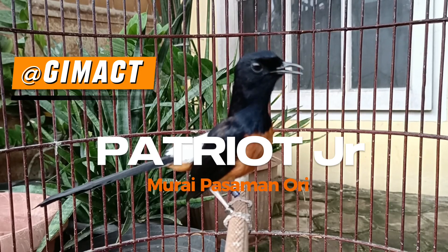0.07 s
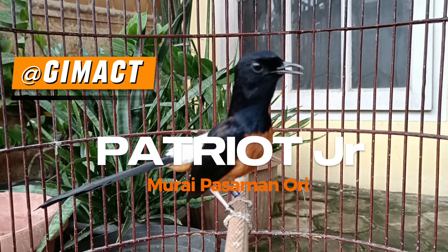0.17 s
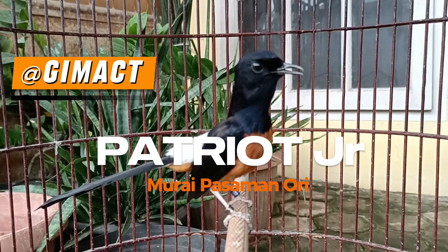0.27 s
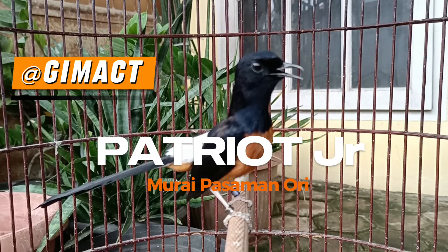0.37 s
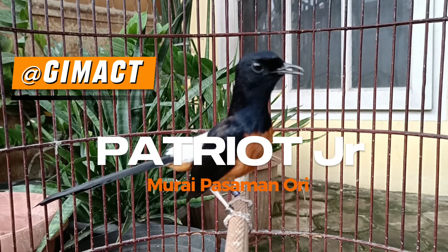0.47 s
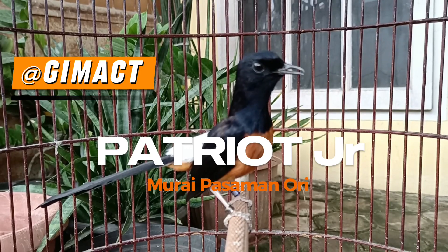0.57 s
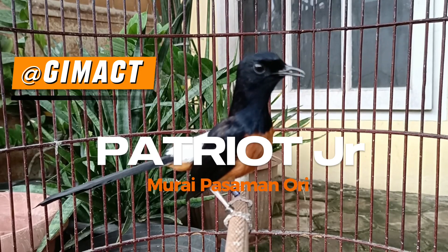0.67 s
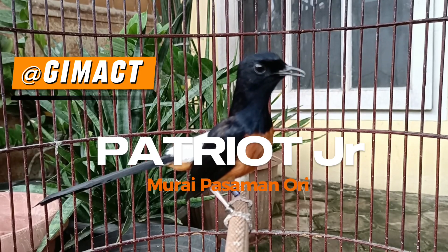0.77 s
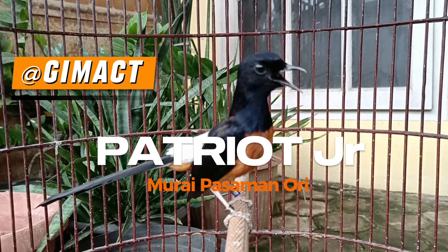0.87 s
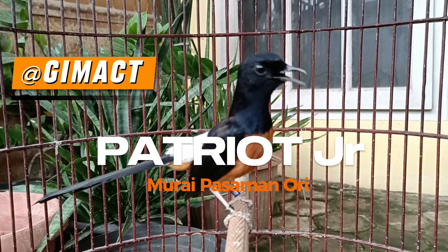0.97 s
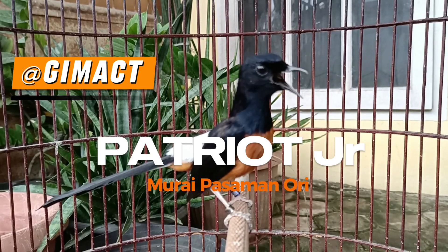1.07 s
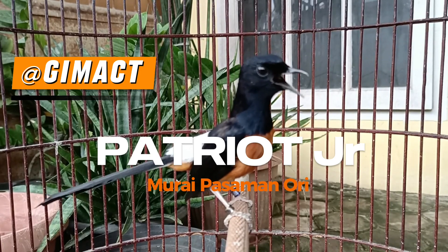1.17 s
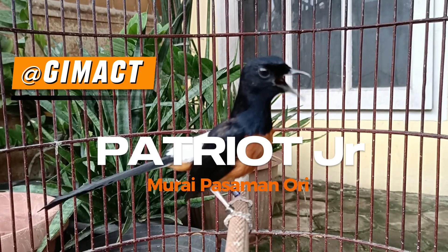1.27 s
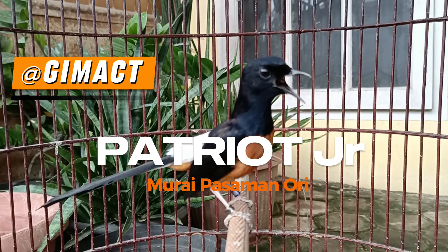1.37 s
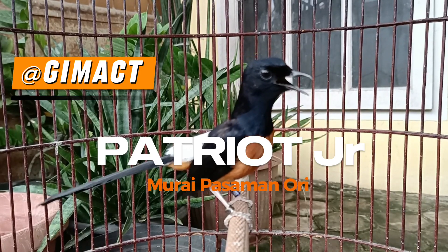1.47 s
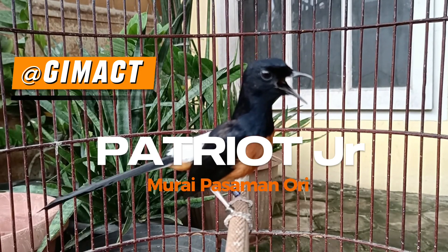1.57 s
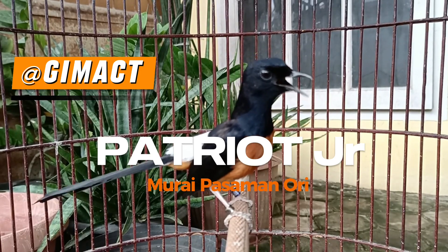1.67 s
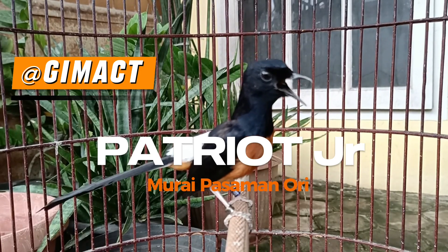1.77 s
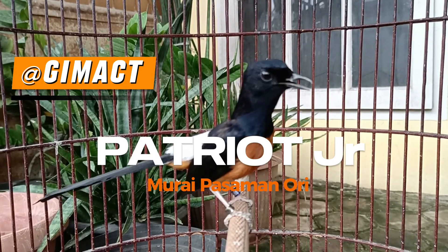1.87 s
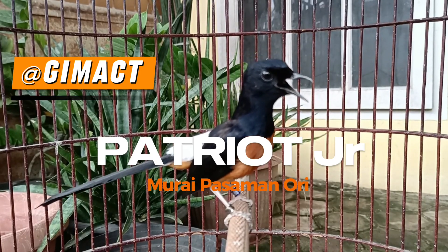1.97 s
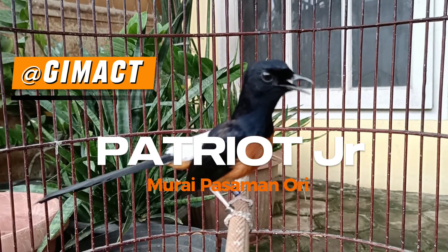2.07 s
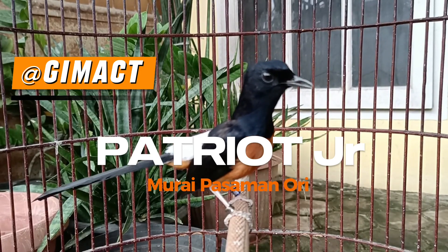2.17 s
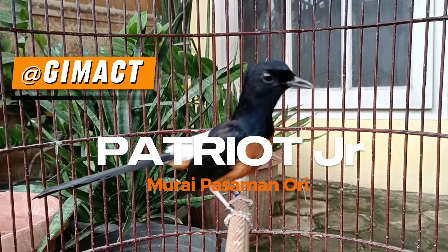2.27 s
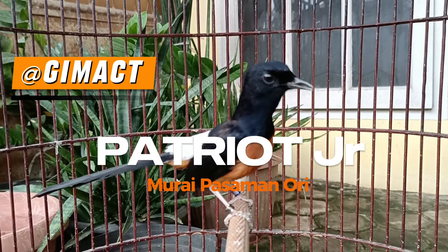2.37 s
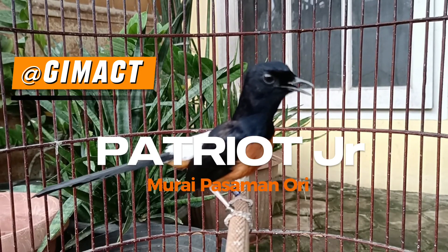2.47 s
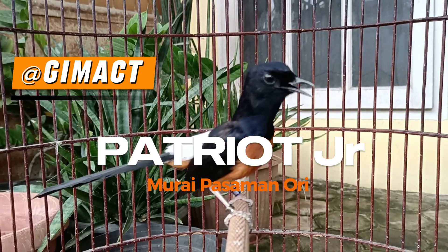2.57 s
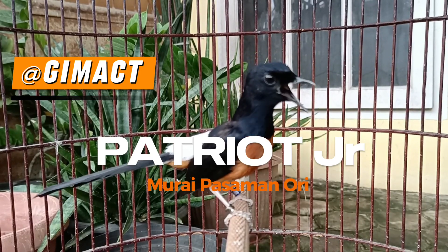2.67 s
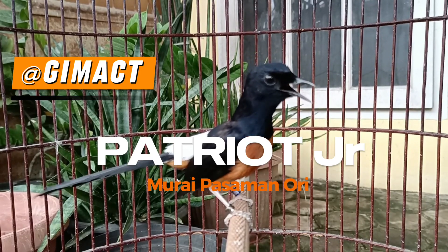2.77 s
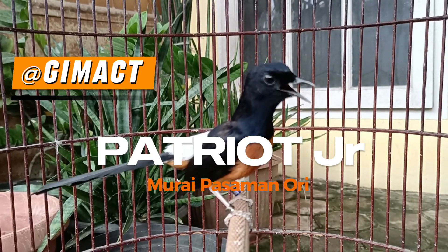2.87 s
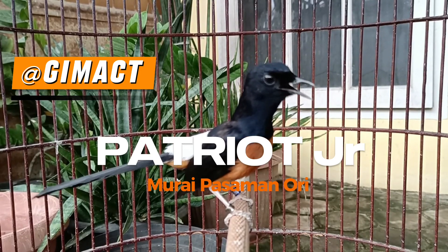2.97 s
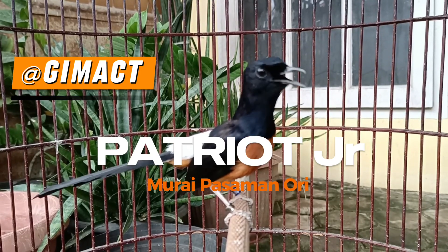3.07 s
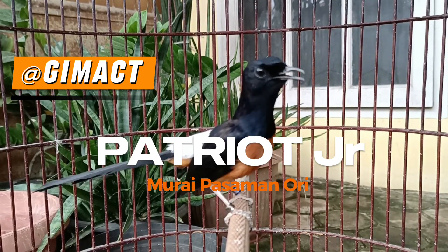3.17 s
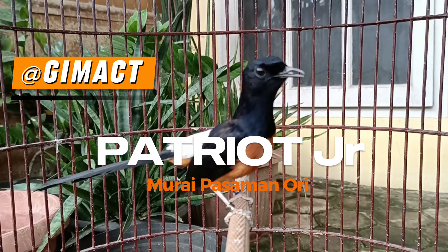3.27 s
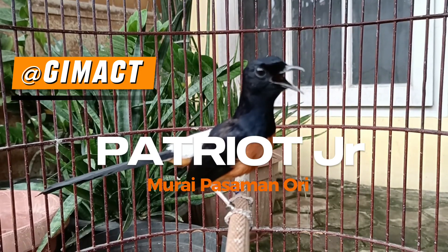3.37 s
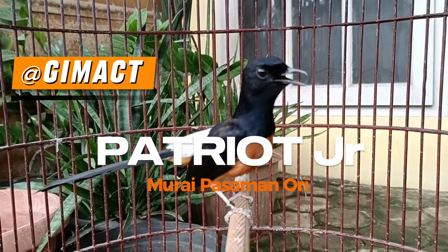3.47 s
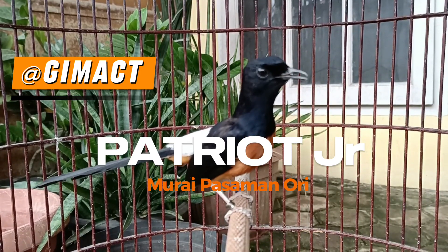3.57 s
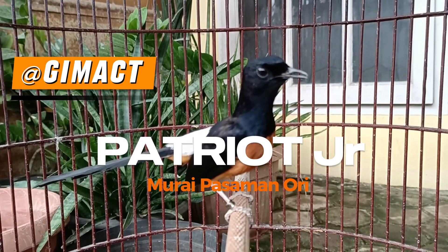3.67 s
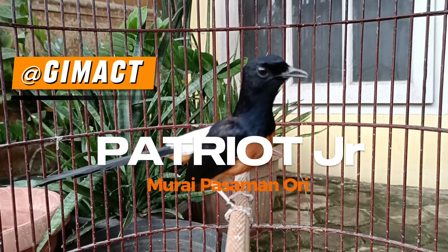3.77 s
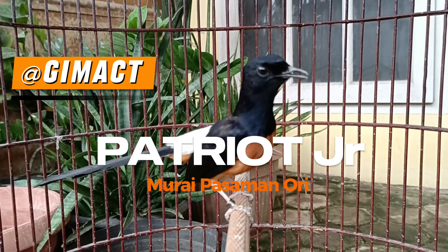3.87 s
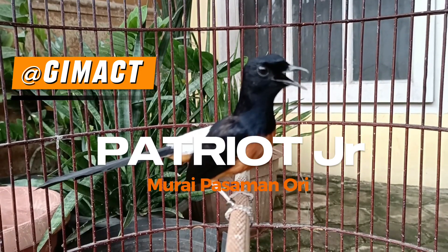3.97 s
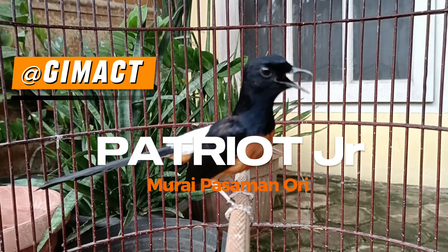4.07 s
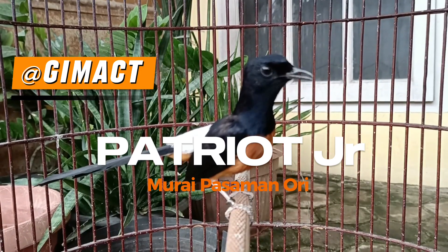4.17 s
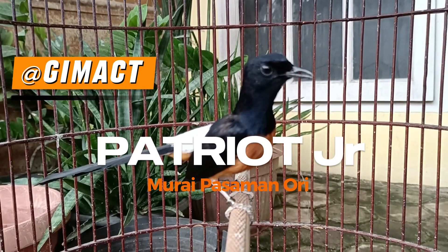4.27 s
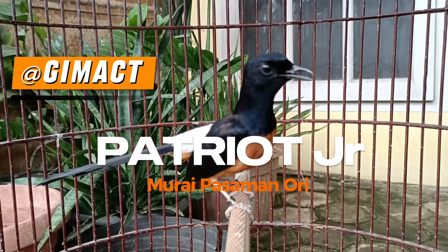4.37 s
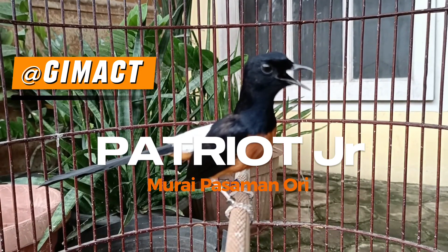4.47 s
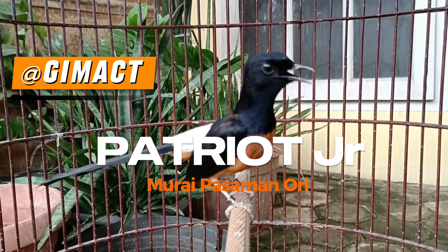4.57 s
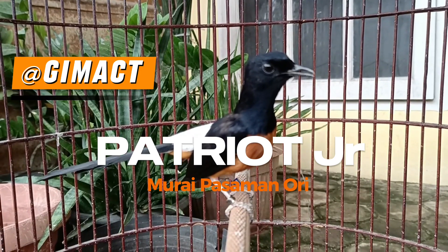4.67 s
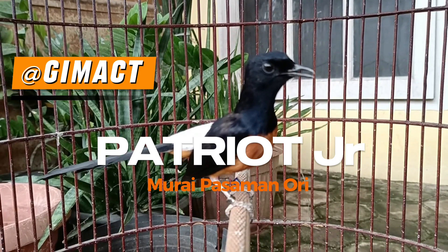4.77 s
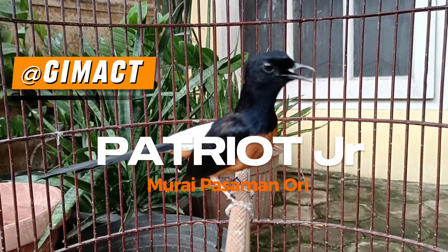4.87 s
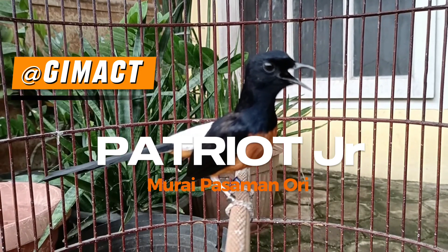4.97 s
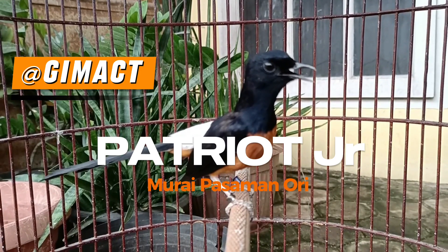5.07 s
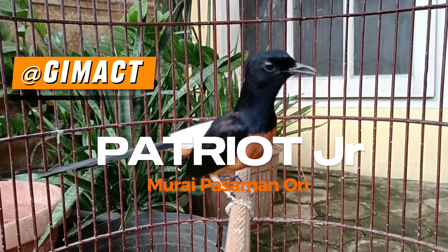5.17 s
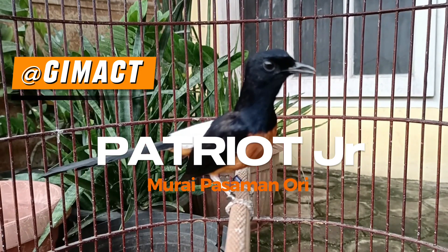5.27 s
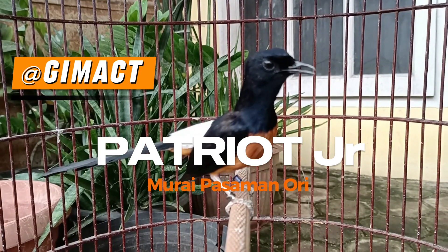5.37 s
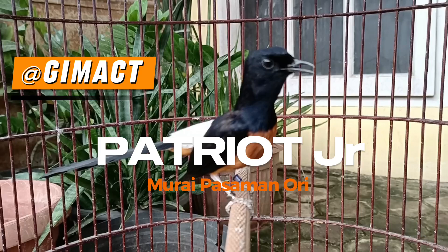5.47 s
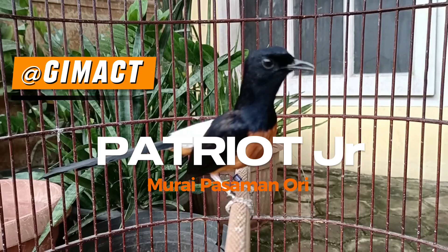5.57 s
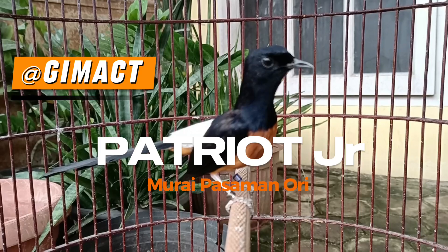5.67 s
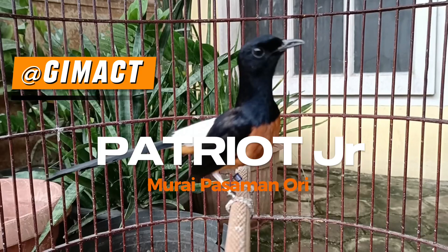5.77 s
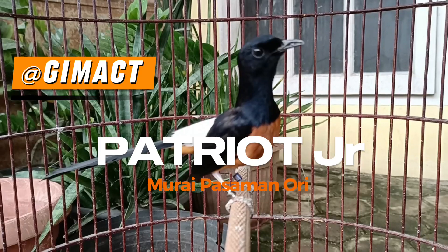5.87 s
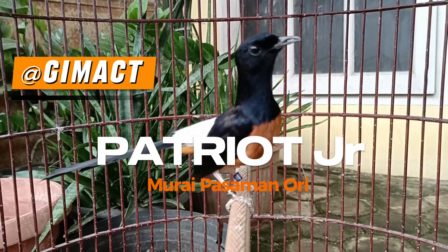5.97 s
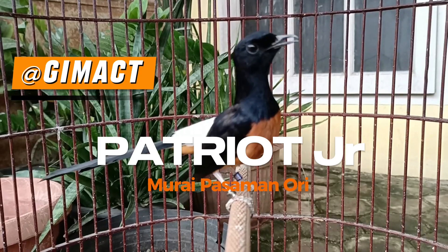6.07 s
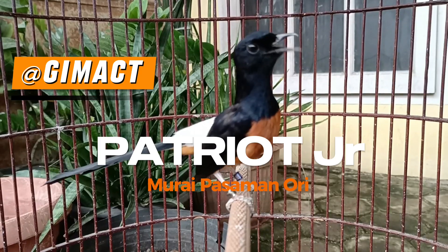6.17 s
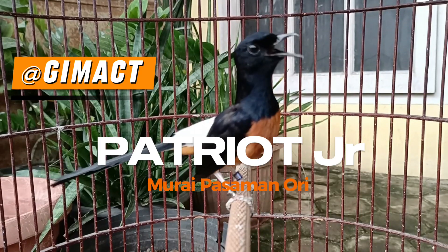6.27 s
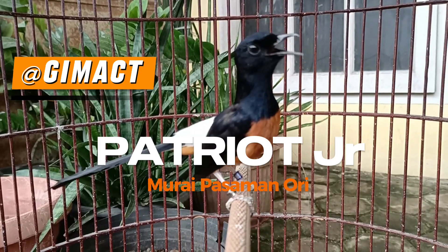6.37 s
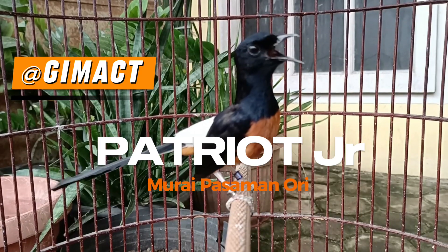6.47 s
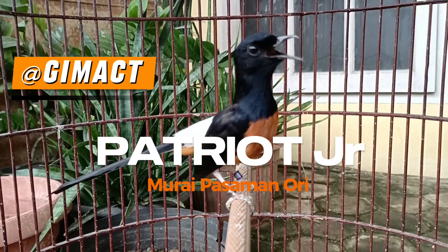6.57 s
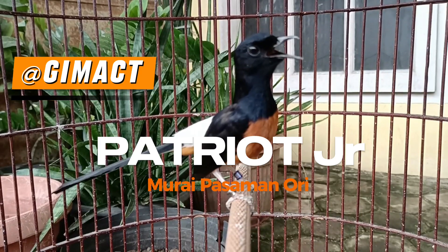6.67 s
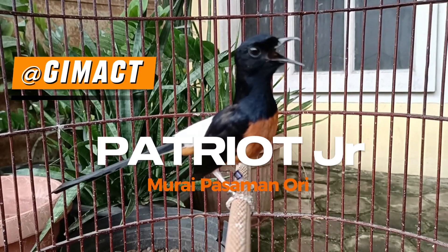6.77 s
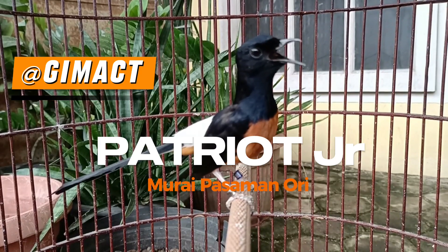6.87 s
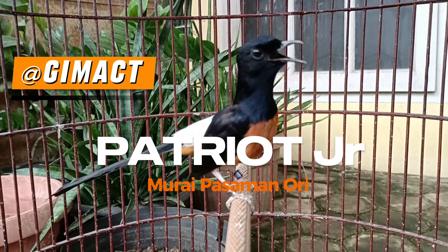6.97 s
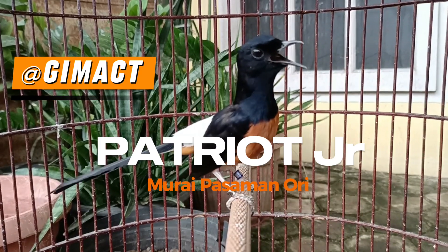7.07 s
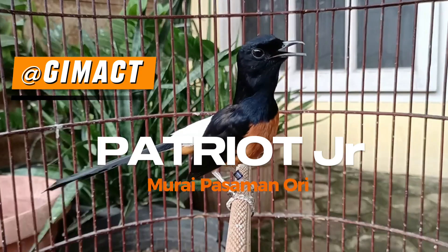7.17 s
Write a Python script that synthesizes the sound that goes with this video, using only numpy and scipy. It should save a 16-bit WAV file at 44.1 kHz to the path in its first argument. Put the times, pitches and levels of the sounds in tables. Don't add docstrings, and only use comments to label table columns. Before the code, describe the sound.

Close, bright birdsong with trilled upsweeps, spaced loud whistles and a rapid string of short notes, over soft open air and far engines.

```python
import sys
import numpy as np
from scipy import signal
from scipy.io import wavfile
from scipy.ndimage import uniform_filter1d, minimum_filter1d

SR = 44100
rng = np.random.default_rng(int(sys.argv[2]) if len(sys.argv) > 2 else 0)


def invert_db(level):
    return 10 ** (np.asarray(level, dtype=float) / 20)


def digitize_waveform(pressure):
    field = np.atleast_2d(pressure).T
    bounded = np.clip(field, -1, 1)
    quanta = np.round(bounded * 32767).astype(np.int16)
    wavfile.write(sys.argv[1], SR, quanta)


N = 318833
T = np.arange(N) / SR


def band(x, lo_hz, hi_hz, order=2):
    sos = signal.butter(order, [lo_hz, min(hi_hz, .45 * SR)], "band", fs=SR, output="sos")
    return signal.sosfilt(sos, x)


def split(x, kind, edge_hz):
    return signal.sosfilt(signal.butter(2, edge_hz, kind, fs=SR, output="sos"), x)


def unit(x):
    return x / np.sqrt(np.mean(x ** 2))


def walk(rate_hz):
    hold = int(SR / rate_hz)
    steps = np.repeat(rng.standard_normal(N // hold + 1), hold)
    return unit(uniform_filter1d(uniform_filter1d(steps, hold), hold)[:N])


def on_log(hz, table):
    table_hz, table_db = np.transpose(table)
    return np.interp(np.log(hz), np.log(table_hz), table_db)


# pitch_hz, level_db (per Hz)
AIR_SPECTRUM = [(12, -40), (20, -10), (76, -7), (153, -8), (181, -12.5), (355, -15.5), (539, -20),
                (891, -22), (3700, -24), (8800, -27), (15800, -37)]
# time_s, level_db
RUMBLE_SWELL = [(0.0, -59), (0.22, -63.5), (1.99, -58), (2.86, -62), (3.7, -62), (3.96, -63), (5.03, -61),
                (5.36, -61), (6.52, -61), (6.8, -64), (7.23, -60.5)]


def air():
    out = 0
    s, db = np.transpose(RUMBLE_SWELL)
    swell_db = np.interp(T, s, db - np.mean(db))
    for hz in 22 * 2 ** np.arange(0, 9.6, .5):
        mid, side = (unit(band(rng.standard_normal(N), hz / 2 ** .25, hz * 2 ** 0.17)) for _ in range(2))
        side_share = np.clip(hz / 550., .4, 1)
        level_db = on_log(hz, AIR_SPECTRUM) + 10 * np.log10(hz / (1 + side_share ** 2)) + 1.5 * walk(7.2)
        level_db = level_db + swell_db * np.clip(500 / hz, 0, 1)
        out = out + invert_db(level_db) * (mid + side_share * side * np.array([[1], [-1]]))
    return unit(out) * invert_db(-52.8)


def hushed_air(heard):
    hush_db, ebb_db_per_s = 5.0, .75
    loud = np.clip(uniform_filter1d(np.abs(heard).mean(axis=0), size=3000) / .03, 0, 1)
    hiss = air()
    treble, bass = split(hiss, "high", 3000), split(hiss, "low", 3000)
    return bass - treble * invert_db(-hush_db * loud - ebb_db_per_s * T)


def engine(curve, orders):
    s, hz, db = np.transpose(curve)
    phase = 2 * np.pi * np.cumsum(np.interp(T, s, hz) * (1 + .003 * walk(12))) / SR
    tone = sum(invert_db(order_db + 2.0 * walk(5)) * np.sin(k * phase) for k, order_db in orders)
    return tone * invert_db(np.interp(T, s, db, left=-140, right=-140)) * np.sqrt(2)


# multiple, level_db
SCOOTER_RUN = [(1.5, 183.2, -86), (2.0, 187.4, -70.5), (2.4, 192, -69), (2.8, 200.4, -70.5),
               (2.9, 205, -92.5)]
SCOOTER_PARTIALS = [(2, -8), (3, -3), (4, 2.5), (5, -9)]
TRUCK_RUN = [(2.6, 34, -73.5), (3.6, 34.3, -63.5), (4.6, 35, -64.5), (5.5, 36.69, -63), (6.5, 38.64, -62),
             (7.23, 40.02, -61.5)]
TRUCK_PARTIALS = [(1, -5), (2, 0), (3, 0.5), (4, -4.5)]


def far_engines():
    return engine(SCOOTER_RUN, SCOOTER_PARTIALS) + engine(TRUCK_RUN, TRUCK_PARTIALS)


# time_s, pitch_hz, level_db
NEIGHBOUR = [
    [(.92, 2120, -42), (1.06, 2180, -53.5)],
    [(1.14, 2180, -46), (1.25, 2220, -54.5)],
    [(4.71, 2400, -41), (4.73, 1950, -41.5), (4.77, 2250, -51.5)],
    [(5.77, 1800, -47.5), (5.81, 2400, -47), (5.825, 1650, -43), (5.85, 2300, -47), (5.87, 1750, -51.5)],
]
# time_s, pitch_hz, level_db
DOVE_COOS = [
    [(2.81, 660, -47), (2.835, 710, -39), (2.86, 800, -45)],
    [(2.885, 700, -46), (2.925, 760, -38), (2.975, 720, -40), (3.0, 690, -46)],
    [(2.995, 400, -44), (3.012, 480, -34), (3.05, 540, -43), (3.12, 520, -49)],
]


def far_birds():
    notes = NEIGHBOUR + DOVE_COOS
    return sing(notes, [(-43, -51, 0.021, 0.49)] * len(notes))


# delay_ms, left_db, right_db
WALL_ECHOES = [(4.352, -23.5, -24.5), (9.06, -23, -14), (14.6, -24, -22), (22.9, -23.5, -23)]
# low_hz, high_hz, t60_s, level_db
WALL_TAILS = [
    (60, 6800, 0.37, -15),
    (6800, 23000, 0.3, -9),
    (300, 19000, 0.89, -34),
]


def yard(x):
    alike = .35
    t = np.arange(SR) / SR
    response = 0
    for lo_hz, hi_hz, t60, db in WALL_TAILS:
        noise = rng.standard_normal((3, len(t)))
        noise = np.sqrt(alike) * noise[0] + np.sqrt(1 - alike) * noise[1:]
        fade = np.exp(-np.log(1000) * t / t60) * np.clip(t / 0.018, 0, 1)
        fade = fade / np.sqrt(np.sum(fade ** 2))
        response = response + invert_db(db) * band(noise, lo_hz, hi_hz, order=3) * fade
    for delay_ms, *db in WALL_ECHOES:
        response[:, int(delay_ms * SR / 1000)] += invert_db(np.array(db))
    return signal.fftconvolve(x, response, axes=1)[:, :N]


# start_s, length_s, low_db, middle_db, high_db
RUSTLE_BURSTS = [(1.557, 0.068, -55, -51, -46), (1.695, .01, -48, -61, -54.5),
                 (2.16, .035, -51.5, -45.5, -39.5), (3.017, .04, -54, -59.5, -74.5),
                 (3.039, 0.026, -62, -47, -37.5), (3.223, 0.024, -60.5, -57, -50),
                 (3.266, 0.02, -34, -31, -40), (4.896, .02, -64.5, -51, -44),
                 (5.253, 0.06, -53.5, -64, -70.5), (7.08, 0.07, -72, -68, -39),
                 (2.87, 0.12, -61, -75.5, -77.5), (6.145, .015, -75, -62, -54), (6.3, .04, -75, -58, -61)]
# low_hz, high_hz
RUSTLE_RANGES = [(70, 800), (800, 3600), (3600, 8500)]


def rustles():
    out = np.zeros((2, N))
    grain = invert_db(1.6 * walk(500))
    for c, (lo_hz, hi_hz) in enumerate(RUSTLE_RANGES):
        shape = np.zeros(N)
        for s, length, *db in RUSTLE_BURSTS:
            rise = .3 * length
            fade = np.exp(-np.clip(T - s - rise - length, 0, 1) / 0.034)
            shape += invert_db(db[c]) * np.clip((T - s) / rise, 0, 1) * fade
        noise = rng.standard_normal((3, N))
        x = band((noise[0] + 0.28 * c * noise[1:]) * grain, lo_hz, hi_hz, order=2 - c // 2)
        out += unit(x) * shape * invert_db(2.5 * walk(40)) * invert_db(np.array([[-1.5], [1.5]]))
    return out


# low_hz, high_hz, level_db
QUILL_RANGES = [(2500, 3600, -35), (4900, 6200, -31.5), (11000, 15500, -48)]


def quills():
    start_s, length_s = 7.105, .075
    swell = np.clip((T - start_s) / 0.022, 0, 1)
    swell = swell * np.exp(-np.clip(T - start_s - length_s, 0, 1) / 0.027)
    hiss = sum(invert_db(db) * unit(band(rng.standard_normal((2, N)), lo_hz, hi_hz))
               for lo_hz, hi_hz, db in QUILL_RANGES)
    return swell * hiss


# start_s, end_s, rate_hz, speed_up_hz_per_s, depth_hz
SHAKES = [(1.708, 1.83, 61, 20, 200), (1.937, 2.06, 49, 130, 345), (0.51, .93, 110, 0, 40),
          (.99, 1.47, 75, 0, 38), (1.52, 1.63, 70, 0, 80), (2.63, 2.78, 39, 0, 45)]


def trill(t, wobble):
    shake = np.zeros(len(t))
    for start, end, rate_hz, gain_per_s, depth_hz in SHAKES:
        cycles = (rate_hz + gain_per_s * (t - start) / 2) * (t - start)
        p = 2 * np.pi * cycles + .25 * wobble
        onset = np.clip((t - start + 0.0026) / 0.0035, 0, 1)
        shake += depth_hz * onset * (t < end) * (0.38 * np.sin(2 * p) - np.cos(p))
    return shake


# pitch_hz, level_db
BEAK_LIFT = [(2500, -0.5), (5200, -7), (7800, -6), (9500, -7.5), (11300, 5.5), (12300, -8), (13500, 2),
             (15300, 11)]


def sing(notes, voices):
    out = np.zeros((2, N))
    waver, flutter_db, wobble = 1 + 0.005 * walk(220), .5 * walk(90), walk(60)
    breath = 1 + 0.006 * walk(1800)
    splash = unit(band(rng.standard_normal((2, N)), 3700, 5800, order=3)) * invert_db(-38)
    for note, (second_db, third_db, pan_db, lag_ms) in zip(notes, voices):
        s, hz, db = np.transpose(note)
        a, b = max(int((s[0] - .003) * SR), 0), min(int((s[-1] + .006) * SR), N)
        t, lag_s = T[a:b], lag_ms / 1000
        pitch = uniform_filter1d(np.interp(t, s, hz), size=200) * waver[a:b] + trill(t, wobble[a:b])
        phase = 2 * np.pi * np.cumsum(pitch) / SR
        fade = np.clip(np.minimum(t - t[0], s[-1] + .004 - t) / .004, 0, 1)
        pressure = uniform_filter1d(np.interp(t, s, invert_db(db / 2)), size=150)
        gain = pressure ** 2 * invert_db(flutter_db[a:b]) * np.sin(fade * np.pi / 2) ** 2 * np.sqrt(2)
        effort = (pressure / pressure.max()) ** .6
        for port, side in enumerate((1, -1)):
            p, g = (np.interp(t - side * lag_s / 2, t, v) for v in (phase, gain))
            tone = np.sin(p) * invert_db(side * pan_db / 2)
            for k, part_db in ((2, second_db), (3, third_db), (4, third_db - 27)):
                shade_db = 1.3 * (k - 1) * side
                level_db = part_db + on_log(k * pitch, BEAK_LIFT) - shade_db + 6.4 * flutter_db[a:b]
                tone += invert_db(level_db) * effort * (k * pitch < .45 * SR) * np.sin(k * p)
            opening = np.clip(np.gradient(g) * SR * .005, 0, 1)
            out[port, a:b] += g * tone * breath[a:b] + opening * splash[port, a:b]
    return out


def syllables(shape, rows):
    share, place, db = np.transpose(shape)
    return [np.transpose([s + length * share, from_hz + (to_hz - from_hz) * place, top_db + db])
            for s, length, from_hz, to_hz, top_db in rows]


# second_partial_db, third_partial_db, left_minus_right_db, left_lag_ms
SWEEP_GESTURE = [(0, 0, -18), (.06, 0, -3), (.27, .13, 0), (.5, .47, 1), (.64, .7, -1), (.82, .96, 0),
                 (1, 1, -7)]
SWEEP_ROWS = [(.959, .128, 3900, 5560, -10), (1.128, .137, 3964, 5620, -9.5),
              (1.306, .134, 3940, 5570, -10), (1.479, .141, 4080, 5590, -11)]
SWEEP_TIMBRE = (-20, -26, -2.2, .476)
WARBLE_GESTURE = [(0, .15, -26), (.07, .02, -3), (.2, .12, 0), (.35, .25, 0), (.6, .62, -1), (.82, 1, -2.5),
                  (1, .9, -11)]
WARBLE_ROWS = [(1.669, .141, 4400, 5350, -9), (1.904, .141, 4250, 4950, -9)]
WARBLE_TIMBRE = (-21, -27, -3, .48)
STEP_GESTURE = [(0, .3, -40), (.13, 0, -13), (.22, .6, -7), (.5, 1, 0), (.86, .75, -6), (1, 0, -26)]
STEP_ROWS = [(2.624, .141, 4400, 4540, -8.5)]
STEP_TIMBRES = [(-14, -17.5, -2.5, .4845)]
FLICK_GESTURE = [(0, 0, -12), (.48, .55, 0), (1, 1, -13)]
FLICK_ROWS = [(3.881, .015, 3000, 4400, -37.5), (4.36, .022, 3450, 4400, -41),
              (4.853, .016, 2900, 4380, -28), (5.338, .02, 2600, 3550, -32)]
SOFT_TIMBRE = (-41, -51.5, -2.0, 0)
SCOOP_GESTURE = [(0, 0, -28), (.26, .62, -23), (.48, .86, 0), (1, 1, -3)]
SCOOP_ROWS = [(3.88, .05, 1945, 3146, -26), (4.36, .06, 1890, 3120, -27), (4.845, .065, 1736, 3158, -22.5)]
SCOOP_TIMBRE = (-19, -54, -15, -.055)
WHISTLE_GESTURE = [(0, -.15, -25), (.1, .02, -9), (.2, 0, 0), (.33, 0, 0), (.55, .25, -1), (.78, .52, -4),
                   (.9, .75, -4), (.95, 1.15, -8), (1, 1.1, -26)]
WHISTLE_ROWS = [(3.924, .14, 4075, 4390, -7), (4.409, .142, 4095, 4400, -6.5),
                (4.902, .143, 4067, 4380, -6.5)]
WHISTLE_TIMBRE = (-28, -28, 0, -.04)
SLIDE_GESTURE = [(0, 0, -24), (.2, .65, -12), (.33, .95, 0), (.8, 1, -3), (1, 1, -6)]
SLIDE_ROWS = [(6.15, .047, 4900, 4420, -16), (7.054, .062, 4600, 4030, -6)]
SLIDE_TIMBRES = [(-8.5, -33.5, -5.5, .03), (-18, -35, .5, -.044)]
PIP_GESTURE = [(0, -2.2, -24), (.07, -.6, -11), (.2, -.1, -2), (.4, .2, 0), (.76, .6, 0), (.9, .9, -4),
               (1, 1, -18)]
PIP_ASIDE_ROWS = [(6.228, .034, 4410, 4480, -11), (6.301, .038, 4420, 4480, -10),
                  (6.37, .035, 4490, 4560, -13), (6.446, .03, 4440, 4500, -9)]
PIP_ASIDE_TIMBRE = (-15, -30, -7, .032)
PIP_ROWS = [(6.515, .045, 4290, 4430, -6), (6.59, .047, 4190, 4360, -7), (6.67, .04, 4110, 4220, -7),
            (6.748, .04, 4130, 4280, -6.5), (6.831, .043, 4060, 4180, -6.5),
            (6.909, .046, 4040, 4160, -7.5)]
PIP_TIMBRE = (-19, -27, -.5, -.03)


def repeated_syllables():
    notes = syllables(STEP_GESTURE, STEP_ROWS) + syllables(SLIDE_GESTURE, SLIDE_ROWS)
    voices = STEP_TIMBRES + SLIDE_TIMBRES
    for shape, rows, voice in [
            (SWEEP_GESTURE, SWEEP_ROWS, SWEEP_TIMBRE),
            (WARBLE_GESTURE, WARBLE_ROWS, WARBLE_TIMBRE),
            (FLICK_GESTURE, FLICK_ROWS, SOFT_TIMBRE),
            (SCOOP_GESTURE, SCOOP_ROWS, SCOOP_TIMBRE),
            (WHISTLE_GESTURE, WHISTLE_ROWS, WHISTLE_TIMBRE),
            (PIP_GESTURE, PIP_ASIDE_ROWS, PIP_ASIDE_TIMBRE),
            (PIP_GESTURE, PIP_ROWS, PIP_TIMBRE)]:
        notes = notes + syllables(shape, rows)
        voices = voices + [voice] * len(rows)
    return notes, voices


# time_s, pitch_hz, level_db; their voices have the columns above
OPENING_NOTES = [
    [(0.065, 2350, -62), (0.09, 2120, -24), (0.106, 1900, -28), (0.116, 1850, -39), (0.122, 1594, -36),
     (0.149, 1335, -50.5), (0.21, 1606, -29.5), (0.259, 1420, -41), (0.27, 1320, -55)],
    [(0.315, 1896, -53), (0.331, 2344, -24.8), (0.346, 2358, -20), (0.364, 2713, -21), (0.375, 2590, -27.5)],
    [(0.42, 2060, -49), (0.515, 2010, -56.5), (0.54, 1720, -50.5)],
    [(0.675, 1826, -68), (0.715, 2110, -51), (0.74, 2040, -57), (0.8, 2050, -60)],
    [(0.755, 2740, -60), (0.785, 2720, -49), (0.8, 2850, -51), (0.825, 2950, -52)],
    [(0.808, 3430, -44), (0.817, 4190, -23.5), (0.834, 4540, -14.5), (0.846, 5200, -12.5),
     (0.88, 5800, -16), (0.895, 5600, -23)],
]
OPENING_TIMBRES = [(-20, -52, 5, -0.028), (-36, -46, 1, 0.0), (-31.5, -30, -0.5, -0.13),
                   (-30, -30, 7.7, -0.023), (-41.5, -30, -9.5, 0.006), (-23, -28, -5, 0.48)]
MIDDLE_NOTES = [
    [(2.413, 2090, -42), (2.444, 2610, -32), (2.478, 2830, -13.5), (2.523, 2737, -12.5), (2.548, 2564, -22),
     (2.559, 2297, -13.5), (2.57, 2370, -20), (2.58, 1920, -45)],
    [(3.272, 4020, -30.5), (3.278, 3850, -18.5), (3.286, 3795, -0.5), (3.312, 3977, -5.5),
     (3.396, 3878, -3), (3.422, 3931, -7), (3.432, 3600, -26)],
    [(5.338, 1477, -62), (5.353, 2180, -35), (5.362, 2265, -25), (5.37, 2240, -26), (5.396, 1570, -37.5),
     (5.408, 1770, -34), (5.423, 2315, -35.5), (5.432, 2340, -28.5)],
    [(2.838, 3600, -40), (2.843, 3470, -22), (2.852, 3540, -15), (2.859, 3710, -4), (2.89, 3780, -2),
     (2.913, 3720, -6), (2.924, 3550, -28)],
    [(3.022, 3000, -40), (3.035, 2950, -25), (3.05, 3060, -15), (3.066, 3100, -8), (3.082, 3160, -5),
     (3.093, 3120, -11), (3.102, 2950, -30)],
]
MIDDLE_TIMBRES = [(-37, -39.5, 1, -0.006), (-26, -35, 2.5, -0.22), (-31, -35, 3.3, 0.0),
                  (-19.5, -39.5, 1.2, -.04), (-33, -50.5, -3.8, -.067)]
CLOSING_NOTES = [
    [(6.075, 3880, -49), (6.08, 4130, -30), (6.091, 4400, -27), (6.105, 4345, -30)],
    [(6.093, 3430, -30), (6.116, 3115, -18.5), (6.136, 2704, -19), (6.148, 2686, -28)],
    [(7.0, 3880, -46), (7.012, 3770, -6.5), (7.023, 3615, -16)],
    [(7.008, 2336, -35.5), (7.038, 2347, -22), (7.049, 2035, -29.5), (7.06, 1986, -42)],
    [(7.168, 1670, -66), (7.18, 1900, -34), (7.213, 2317, -14.5), (7.221, 2357, -17), (7.229, 2337, -29)],
]
CLOSING_TIMBRES = [(-19.5, -47.5, -4.5, 0.006), (-35.5, -46.5, -4, -0.071), (-27, -42, 3, -0.034),
                   (-35, -50, 1.4, -0.006), (-30, -35, 1.3, 0.0)]
# time_s, pitch_hz, level_db
FAINT_FALLS = [
    [(0, 1610, -50), (.04, 1490, -60)],
    [(5.4, 2800, -50), (5.42, 2700, -46), (5.44, 2570, -50)],
    [(6.125, 5920, -59), (6.15, 4950, -54)],
]


def bird():
    notes, voices = repeated_syllables()
    notes = OPENING_NOTES + MIDDLE_NOTES + CLOSING_NOTES + FAINT_FALLS + notes
    soft = [SOFT_TIMBRE] * len(FAINT_FALLS)
    voices = OPENING_TIMBRES + MIDDLE_TIMBRES + CLOSING_TIMBRES + soft + voices
    return sing(notes, voices)


def scene():
    near = bird() + rustles() + quills()
    heard = near + yard(near + far_birds())
    return heard + far_engines() + hushed_air(heard)


def limiter(x):
    limit_db, ratio = -2.6, 8.0
    peak = uniform_filter1d(-minimum_filter1d(-np.abs(x).max(axis=0), size=260), size=260)
    return x * np.minimum(invert_db(limit_db) / peak, 1) ** (1 - 1 / ratio)


def squelch(x):
    mask_db, mask_db_per_octave, mask_from_hz = -55, 3.0, 700
    hz, _, z = signal.stft(x, SR, nperseg=2048, noverlap=1536)
    which = np.searchsorted(np.geomspace(mask_from_hz, SR / 2, 46), hz)
    which = np.unique(which, return_inverse=True)[1]
    bands = range(which.max() + 1)
    size = np.sqrt([np.mean(np.abs(z[:, which == b]) ** 2, axis=1) for b in bands])
    centre_hz = np.array([hz[which == b].mean() for b in bands])[:, None, None]
    floor_db = mask_db + mask_db_per_octave * np.log2(centre_hz / 4000)
    keep = size > size.max(axis=0) * invert_db(floor_db)
    keep |= centre_hz < mask_from_hz
    kept = z * keep[which].transpose(1, 0, 2)
    return signal.istft(kept, SR, nperseg=2048, noverlap=1536)[1][:, :N]


def band_limit(x):
    return signal.sosfilt(signal.butter(12, 15940, fs=SR, output="sos"), x)


def record(dry):
    low_pass = signal.ellip(10, .3, 80, 15750, fs=SR, output="sos")
    mix = squelch(signal.sosfilt(low_pass, limiter(dry)))
    return band_limit(mix)


dry = scene()
out = record(dry)
digitize_waveform(out)
```